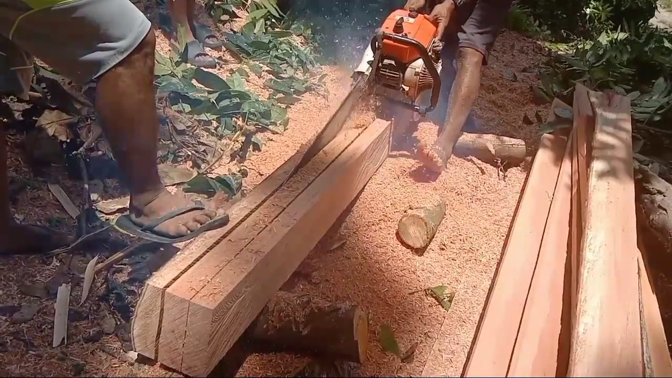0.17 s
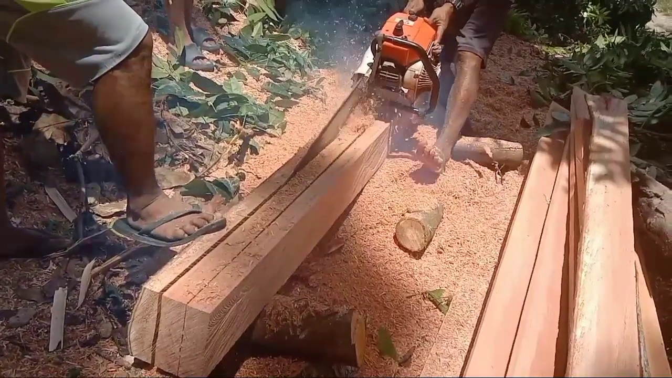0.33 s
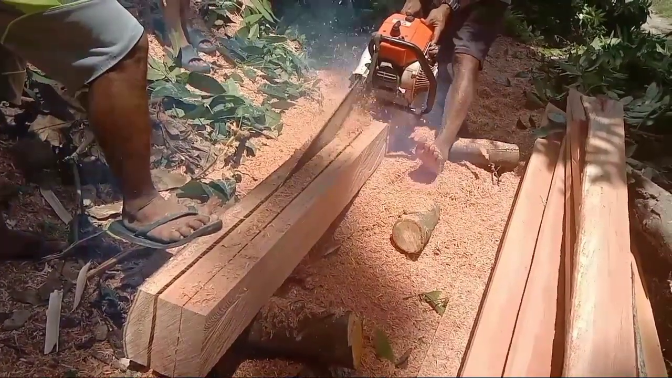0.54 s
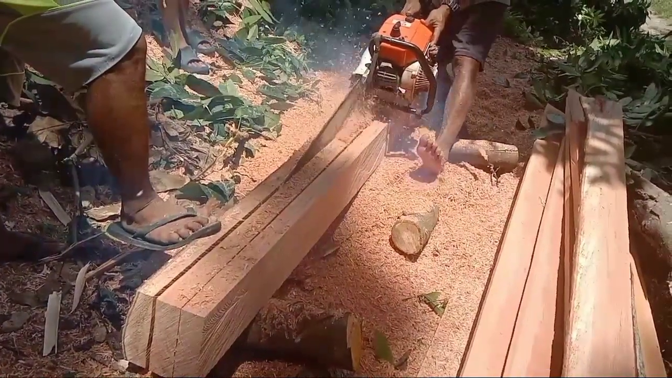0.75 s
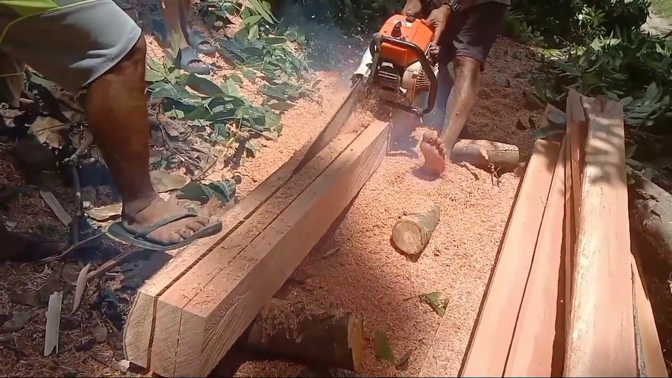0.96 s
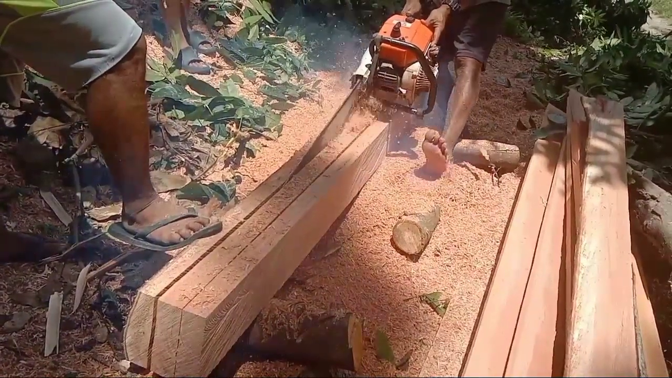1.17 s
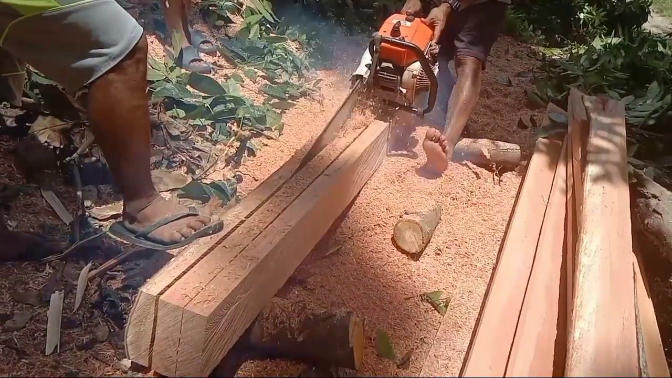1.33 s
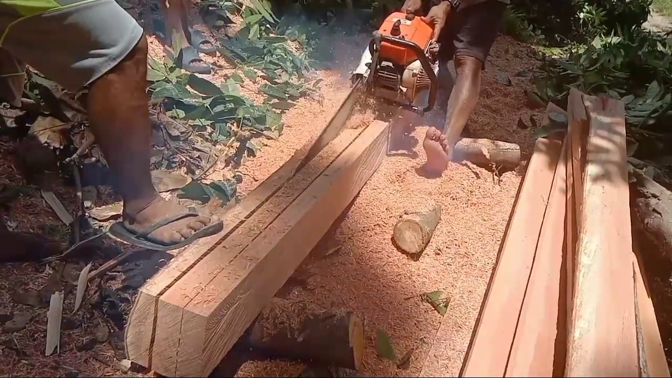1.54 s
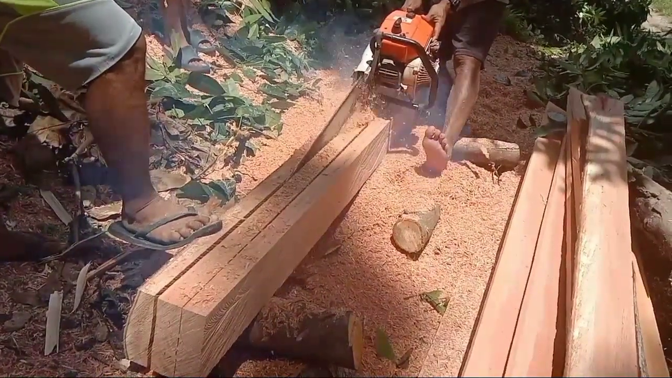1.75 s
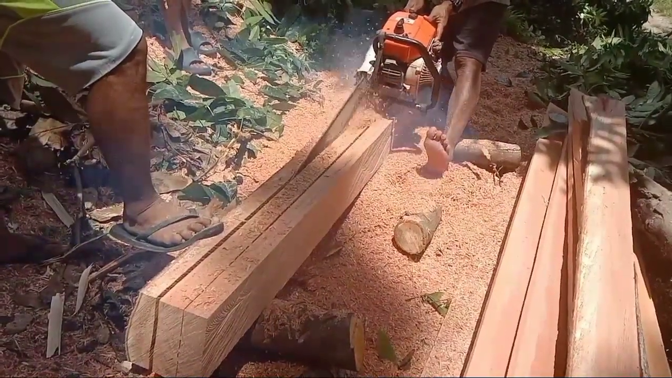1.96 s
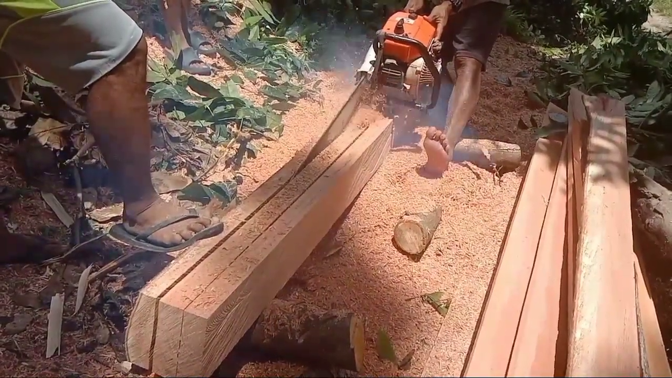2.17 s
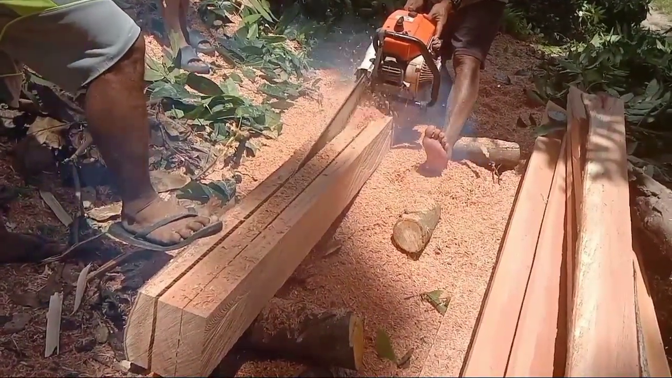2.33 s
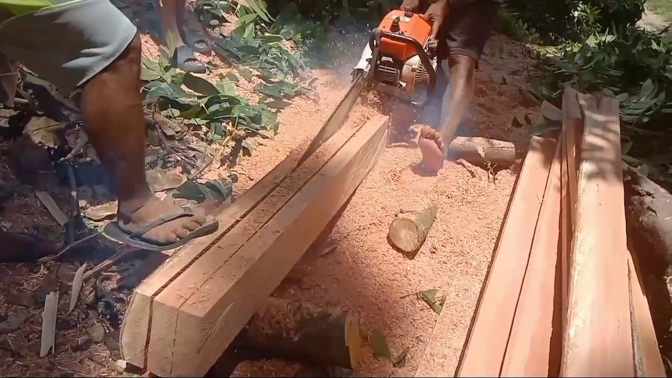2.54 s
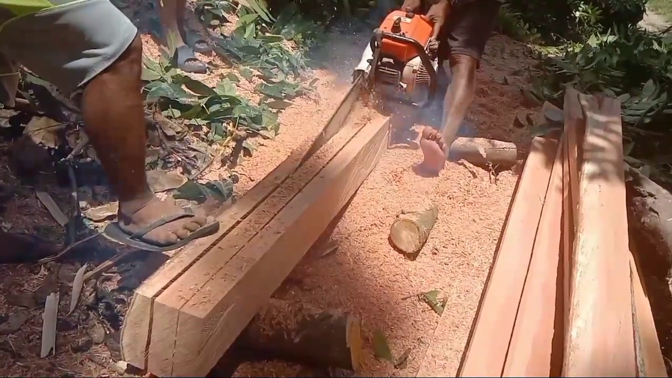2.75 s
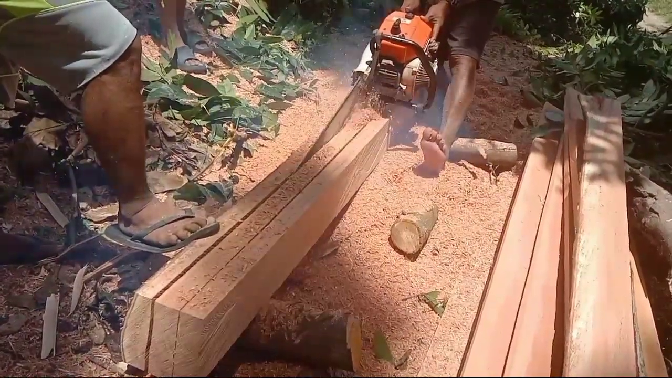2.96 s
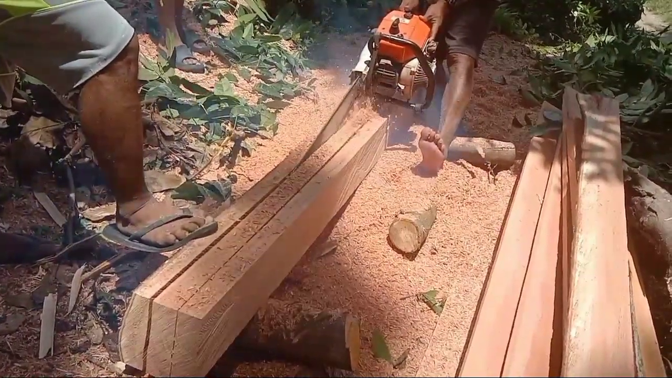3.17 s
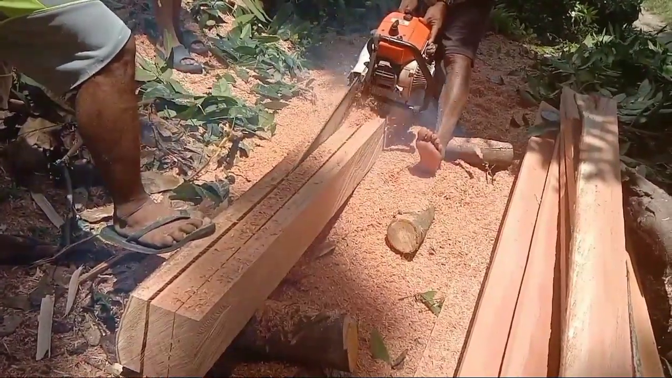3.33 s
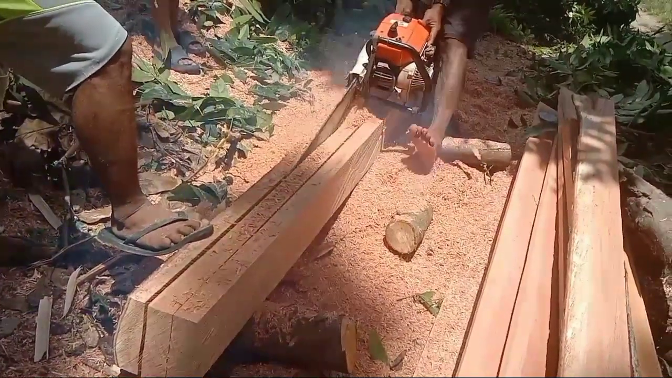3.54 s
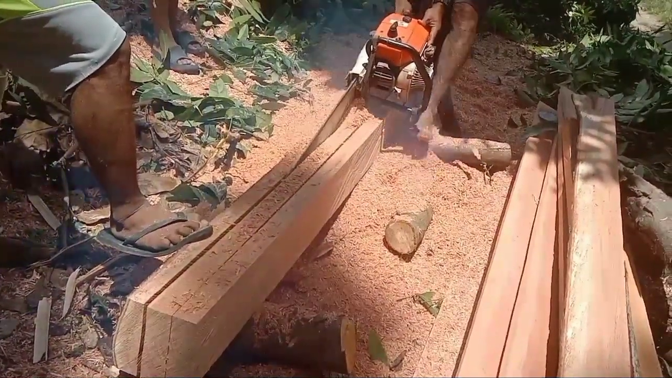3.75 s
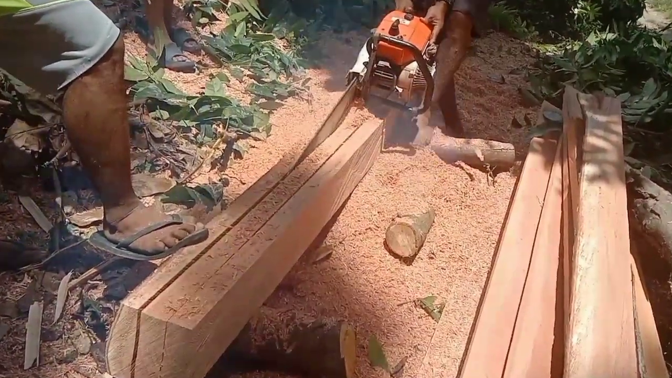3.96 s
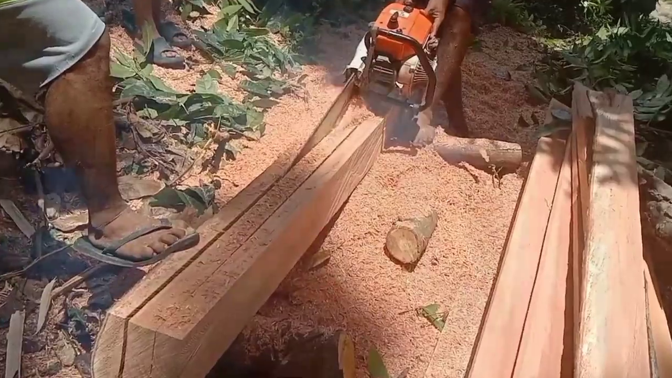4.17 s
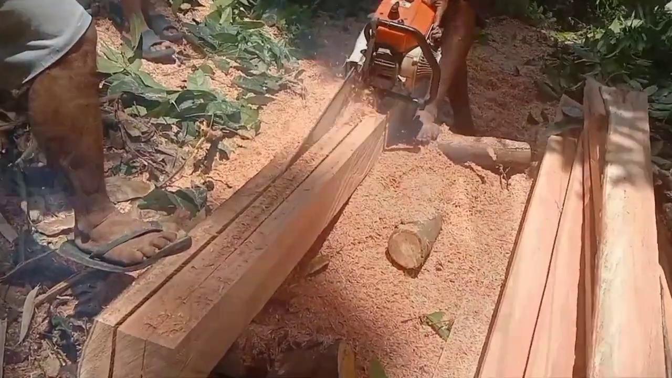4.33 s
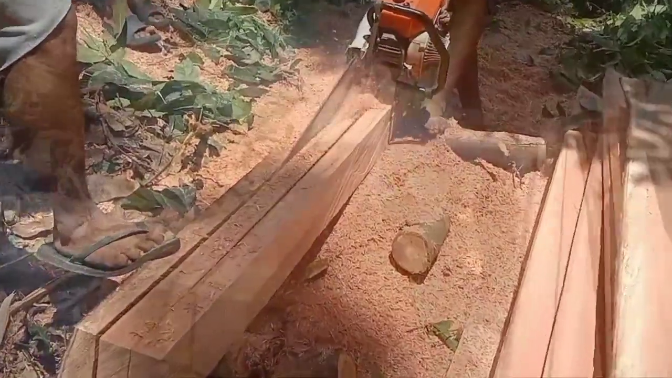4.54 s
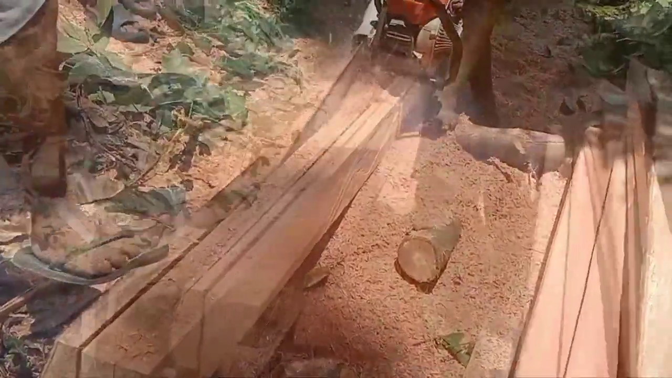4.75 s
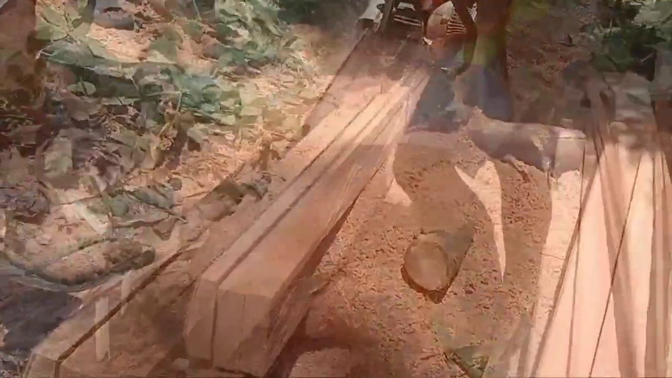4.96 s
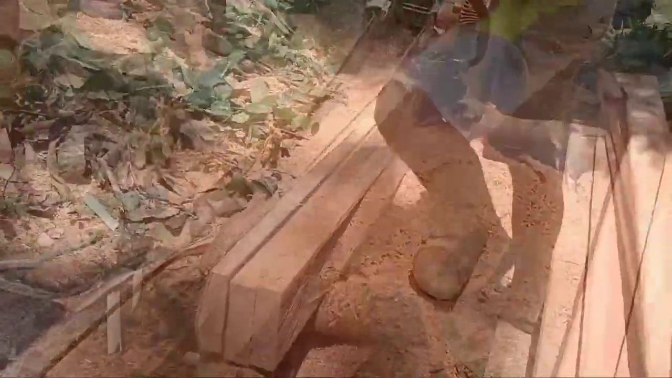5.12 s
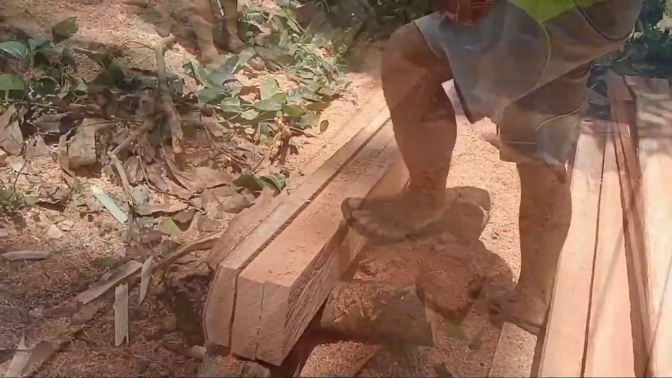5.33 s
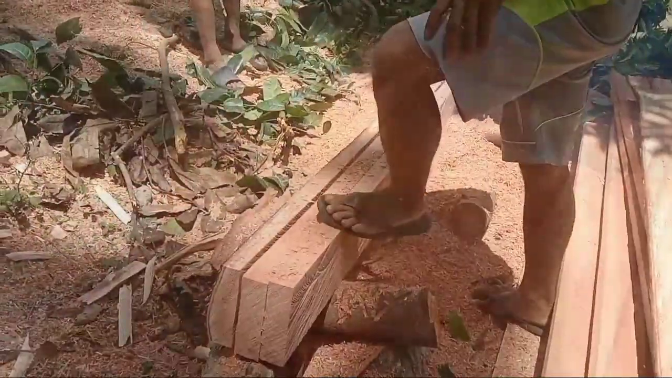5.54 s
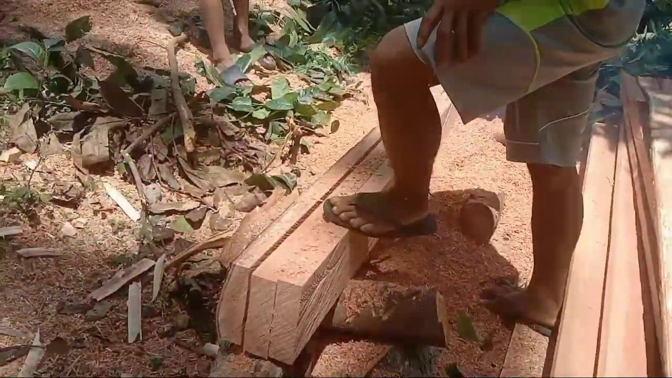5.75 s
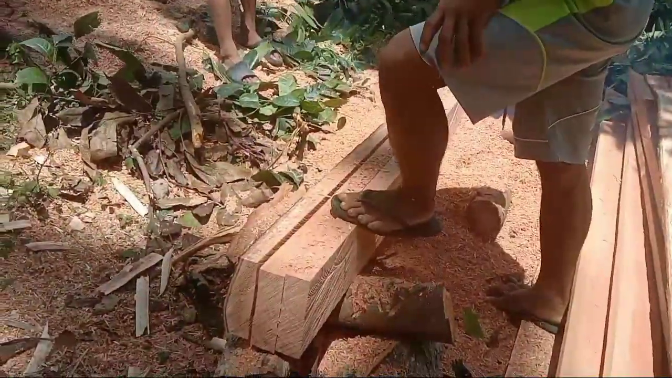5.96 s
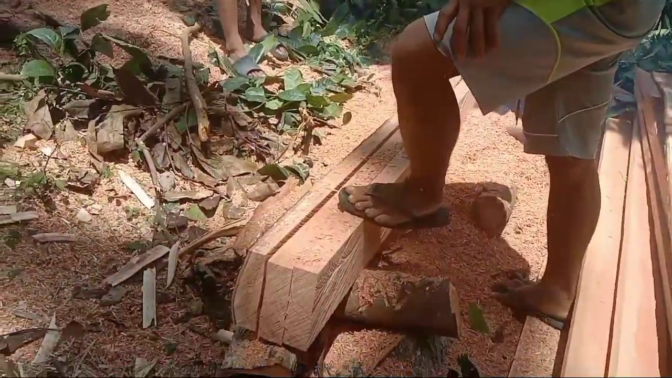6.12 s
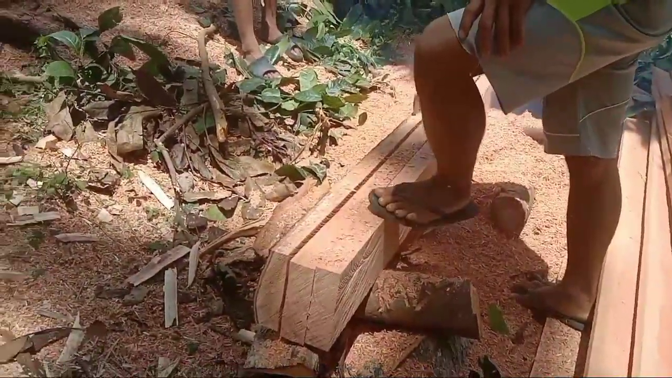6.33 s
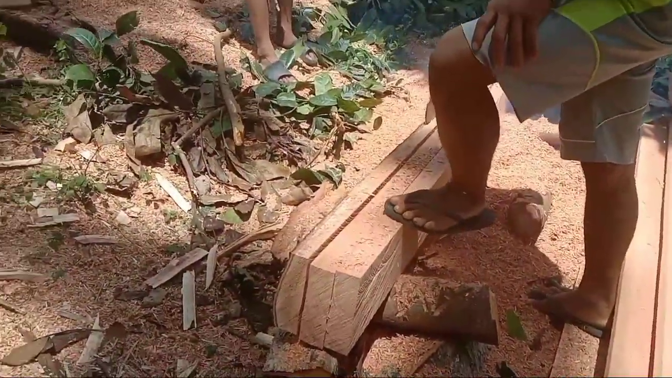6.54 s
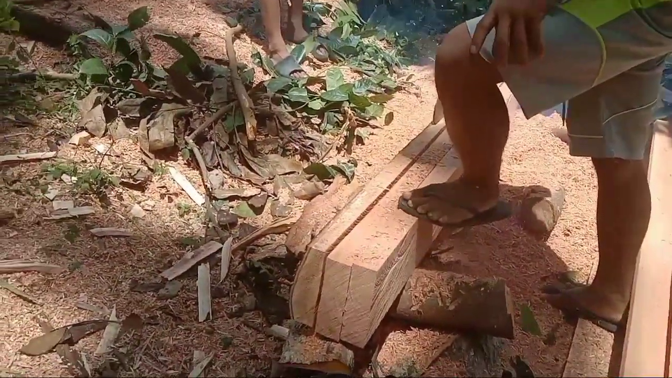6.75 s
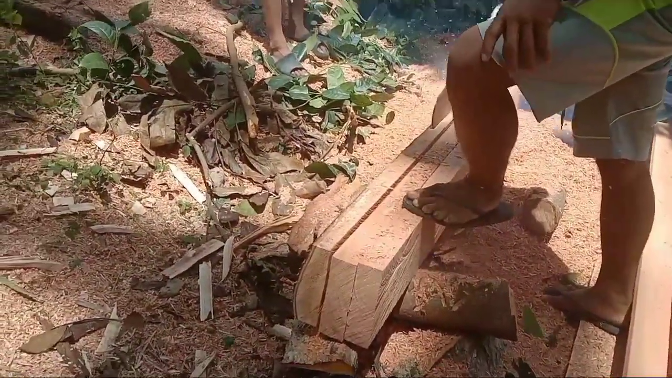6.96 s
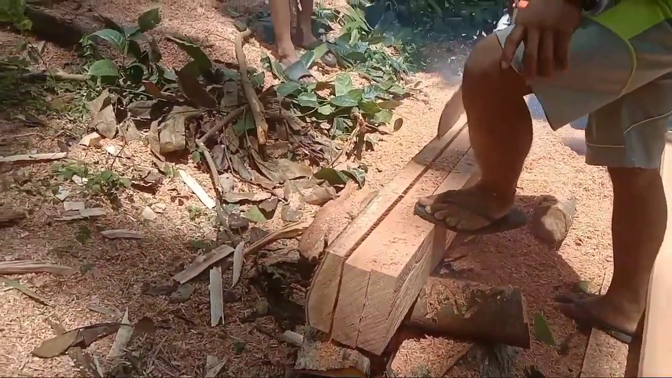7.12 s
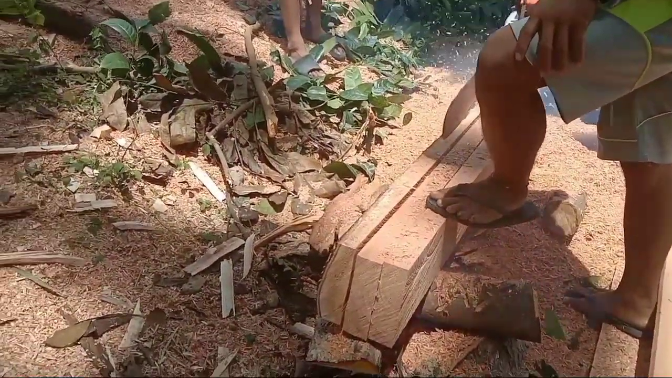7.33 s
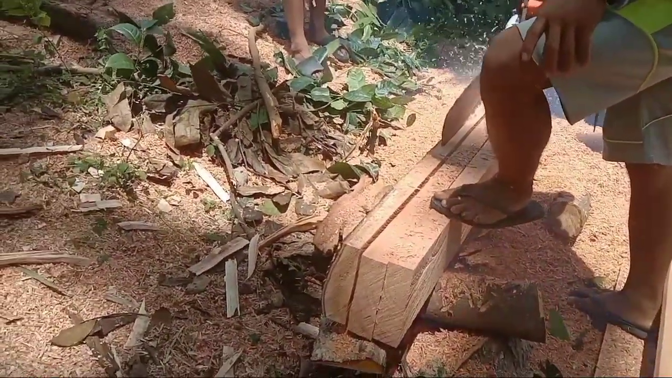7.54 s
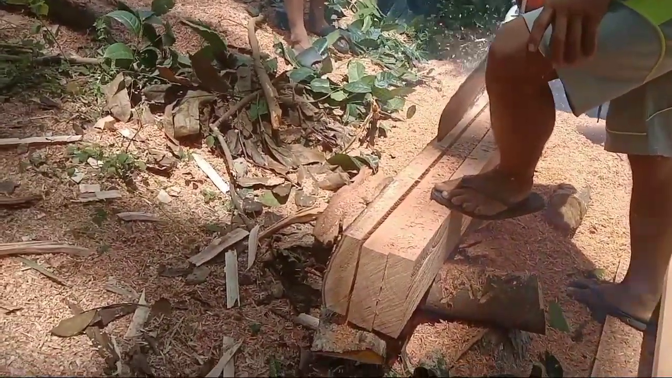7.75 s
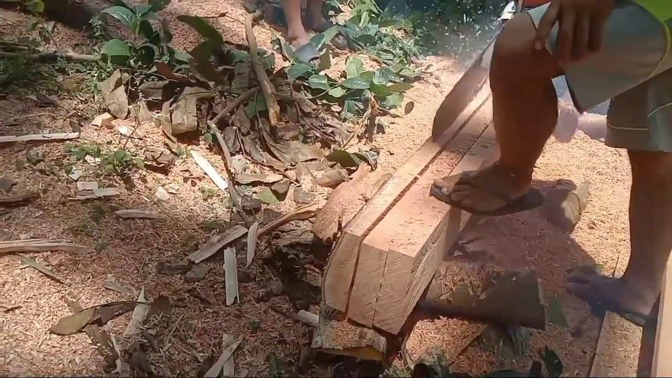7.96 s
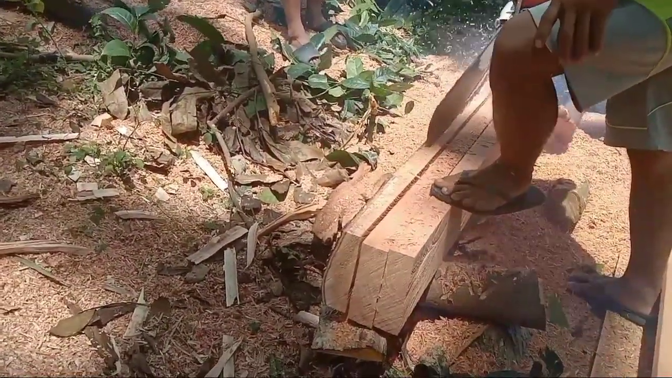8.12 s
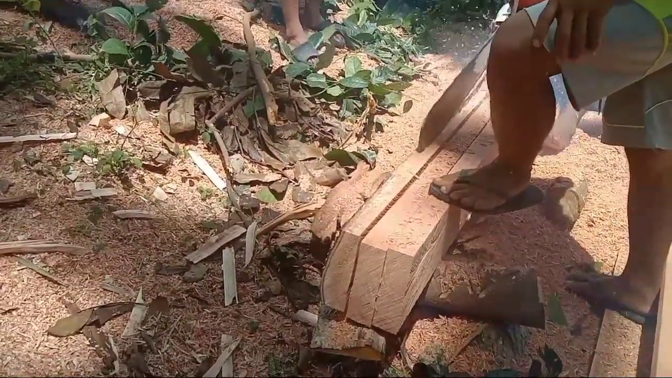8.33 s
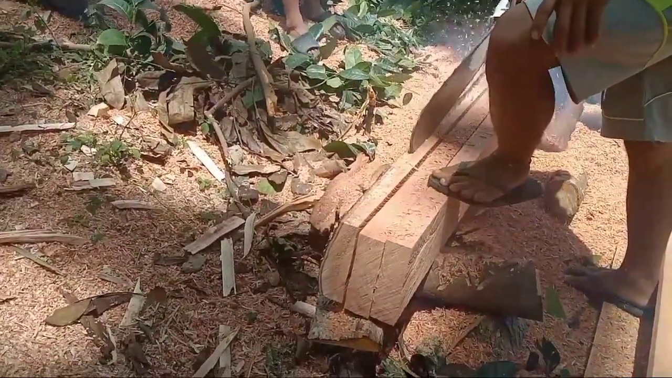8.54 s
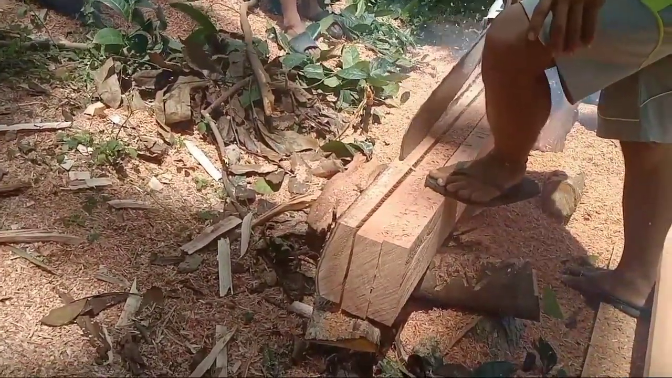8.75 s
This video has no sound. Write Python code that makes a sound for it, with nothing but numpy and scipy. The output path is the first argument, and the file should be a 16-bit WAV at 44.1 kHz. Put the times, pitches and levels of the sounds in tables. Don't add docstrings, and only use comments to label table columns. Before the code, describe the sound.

A two-stroke chainsaw snarls through a timber beam outdoors, coasts down briefly, revs up again, then continues with rough, uneven firing and wind thumps.

```python
import sys
import numpy as np
from scipy import signal
from scipy.io import wavfile
from scipy.ndimage import uniform_filter1d

SR = 44100
rng = np.random.default_rng(int(sys.argv[2]) if len(sys.argv) > 2 else 0)


def amplitude_ratio(level_db):
    exponent = np.asarray(level_db, float) / 20
    return 10 ** exponent


def persist_wave(psi):
    counts = np.round(np.clip(psi, -1, 1) * 32767).astype(np.int16)
    wavfile.write(sys.argv[1], SR, np.atleast_2d(counts).T)


N = 392049

# time in seconds, level in dB.
THUMPS = [(0.041, -23), (0.225, -43), (0.631, -38), (0.798, -22), (1.175, -28), (1.38, -25), (1.874, -22),
          (2.17, -36), (2.495, -31), (2.637, -37), (2.965, -40), (3.199, -28), (3.75, -49), (4.275, -36),
          (4.355, -35), (4.428, -31), (4.879, -39), (5.004, -40), (5.08, -32), (5.439, -45), (6.096, -50),
          (6.309, -23), (6.366, -27), (6.507, -34), (6.846, -42), (7.239, -32), (7.878, -39), (8.39, -24),
          (8.575, -43), (8.727, -40)]
# frequency in Hz, level in dB.
GUST_SPECTRUM = [(20, -25), (45, -12), (90, -6), (140, -5), (210, -2.5), (320, -11.5), (600, -8.5),
                 (1500, -68)]
CHIP_SPECTRUM = [(50, -14), (150, -1), (500, -2), (1500, -6), (2500, -16), (9000, -40)]
DRAUGHT_DB, CALM_DB = -18.5, -55
SHUT_CALM_DB = 68
CHIPS_PER_S, CHIP_S, CHIP_DB = 18, .0012, -2

# time in seconds, turns per second in Hz.
NEAR_SPEED = [(0.03, 101.74), (0.52, 104.1), (0.84, 100.82), (0.99, 101.07), (1.05, 99.48), (1.45, 98.49),
              (1.7, 100.62), (1.96, 103.66), (2.24, 101.12), (2.78, 100.71), (2.84, 101.43), (3.02, 100.02),
              (3.28, 100.18)]
FAR_SPEED = [(5.0, 102.55), (5.39, 103.67), (5.76, 101.17), (5.93, 100.38), (6.24, 102.34), (6.3, 102.1),
             (6.57, 99.46), (6.78, 102.52), (6.88, 102.02), (6.94, 101.28), (7.21, 100.7), (7.62, 103.11),
             (7.76, 102.0), (8.04, 101.3), (8.27, 104.29), (8.53, 100.85), (8.62, 99.64), (8.86, 99.39)]
NEAR_TURN, FAR_TURN = 1.52, .44
SLOWS_S, SHUT_S, OPEN_S = 3.3, 3.325, 4.1
SHUT_TAKES_S, OPEN_TAKES_S = .016, 0.3
FUEL_LEFT, FUEL_RUNS_OUT_PER_S, FUEL_KICK = 0.55, 0.32, 0.26
DROP_HZ, DROP_S, SAG_HZ_PER_S = 15.5, .115, 35
FREE_HZ, PICKUP_S, PICKUP_LAG_S = 104.2, .19, .1
FAR_THROTTLE = 0.91

# time in seconds, level in dB, how far the engine shell faces the microphone in dB.
NEAR_LEVEL = [(0, -13, -1), (.9, -14, 1.5), (2, -13.5, 0), (2.3, -13.5, -2.5), (3.29, -14, -3),
              (3.348, -21.5, 2.5), (3.392, -16.5, -0.5), (3.47, -17, -0.5), (3.74, -18.5, 0.5),
              (3.78, -20.5, -2), (4.05, -24.5, -6.5), (4.14, -22.5, -3), (4.18, -24, 3), (4.3, -21, 4.5),
              (4.6, -23.5, 4), (4.8, -26.5, 4), (5.2, -32.5, 0), (5.45, -34, 3)]
FAR_LEVEL = [(4.4, -34.5, -12), (4.7, -26.5, -1), (4.998, -23.5, 1.5), (5.2, -25, 3), (5.32, -21.5, -0.5),
             (5.745, -19, 0), (5.76, -16, 2.5), (6.15, -15, -2.5), (6.4, -16.5, 2), (6.75, -15, -2),
             (7.1, -16, 2), (7.57, -14, -1.5), (7.95, -14.5, -0.5), (8.25, -14.5, -0.5), (8.8, -16.5, 6),
             (8.86, -14, -0.5)]
# level in dB re loudness, share of facing followed, dB lost at shut throttle.
NEAR_LAYERS = [
    (-13.5, 1.1, 0.5),
    (-23.5, 0.92, 12),
    (-16.5, 0.32, 1),
]
FAR_LAYERS = [
    (-19.5, 1.4, 0),
    (-20.5, 0.87, 0),
    (-21, 0.9, 0),
]
# start in seconds, end in seconds, even blows over odd blows
# in dB, upper ring gain in dB.
NEAR_SPELLS = [
    (1.61, 1.844, 2, 2),
    (3.33, 4.12, -3, 0),
    (4.207, 4.356, -1, 3),
]
FAR_SPELLS = [
    (4.4, 4.897, 3.2, 0),
    (4.914, 5.302, 4.5, 6),
    (5.41, 5.989, 4.5, 3),
    (6.286, 6.634, -4, 1.5),
    (6.837, 6.96, 5.5, 4),
    (6.965, 7.278, 6.5, 10.5),
    (7.707, 7.836, -4.5, 5),
    (7.92, 8.004, -2, 1.5),
    (8.32, 8.818, -6, 5),
]
SPELL_EDGE_S = 0.053
# time in seconds, share of the blow returned.
NEAR_ECHO = [(0, 0.32), (1.9, 0.13), (4.2, .11), (4.42, 0.34), (5.5, .09)]
FAR_ECHO = [(6.8, .065), (6.9, 0.21), (8.8, 0.23)]

# frequency in Hz, rise in s, port open in s, share left ringing, ring decay in s,
# echo delay in s, blow scatter in dB, timing scatter in s.
NEAR_PIPE = (874.3, 0.00051, 0.00264, 0.47, 0.0036, .0052, 0.54, 0.000034)
FAR_PIPE = (827.5, 0.00029, 0.00342, 0.14, 0.0005, 0.00563, 0.34, 0.0000088)
COLD_PIPE = (813.7, 0.005, 0.00273, 0.7, 0.0021)
SOFT_PIPE = (825, .0012, .0023, .55, .0014)
DEEP_PIPE = (693, 0.003, 0.0027, 1.02, 0.0011)
SECOND_BLOW = 0.3676
SOFT_LATE_S, WEAK_PUFF_LATE_S = .0009, 0.00162
SINK_FROM_S, SINK_TAKES_S = 7.25, 1.3
SINK, SUNK_PITCH = .6, 0.9
# frequency in Hz, width in Hz, level in dB, dB lost per echo share.
NEAR_SIDE, FAR_SIDE = (1192, 143, -25, 6), (1124, 128, -17, 48)
# frequency in Hz, level in dB.
NEAR_PUFF = [(40, -77), (100, -16), (200, -34), (400, -21), (520, -42), (620, -14.5), (1250, -14.5),
             (1450, -21.5), (1750, -16.5), (2050, -17.5), (3500, -29.5), (6000, -53)]
FAR_PUFF = [(40, -58), (100, -12.5), (200, -16.5), (300, -28), (450, -16), (1100, -23.5), (1300, -15),
            (1700, -22), (1950, -23), (2100, -29), (2500, -26), (2780, -29.5), (3150, -19.5), (3600, -42),
            (6000, -67)]
COLD_PUFF = [(80, -55), (125, -20), (200, -20), (330, -13), (450, -21), (550, -28), (1000, -47)]

# frequency in Hz, width in Hz, level in dB.
CASE = [
    (250, 60, -37),
    (352, 70, -34),
]
# frequency in Hz, width in Hz, random share from 0 to 1.
NEAR_SHELL = [
    (2340, 150, .06),
    (3200, 300, .2),
]
FAR_SHELL = [
    (2320, 200, .07),
    (3000, 200, .1),
]
# frequency in Hz, width in Hz, level in dB, start in seconds.
COLD_SHELL = [
    (1895, 120, 7, 3.33),
    (2460, 150, -3, 3.4),
    (4990, 150, -6, 3.52),
]
COLD_FADE_S, COLD_FADE_TAKES_S = 3.8, .35
# order, start in s, end in s, level in dB re lower ring, phase in turns.
NEAR_ORDER, FAR_ORDER = (23, -1, 4.7, -4.5, 0.3), (31, 7.35, 8.3, -4, 0.7)
# frequency in Hz, level in dB.
NEAR_HISS = [(2000, -50), (3400, -4), (3600, -25), (4140, -19), (5110, -5.5), (5960, -12), (6150, -10.5),
             (6510, -3), (6810, -1.5), (9550, -21), (10200, -20), (11300, -13), (12900, -6), (14900, -10.5),
             (15600, -3)]
FAR_HISS = [(2000, -69), (3400, 1), (3650, -3.5), (3860, -31), (4140, -18), (5110, -7.5), (5730, -8.5),
            (6310, -2), (7210, 2.5), (7840, -2), (8790, -16), (9670, -15.5), (14000, -5.5), (14900, -3),
            (15600, -4)]
ROAR = [(60, -30), (300, -5), (600, -4), (900, 0), (1300, 0.5), (2000, -7.5), (2400, -14), (3300, -11.5),
        (4200, -16.5), (5500, -11.5)]
NEAR_FIN_HZ, FAR_FIN_HZ, FIN_WIDTH_HZ, FIN_DB = 6810, 7150, 520, -8.5
# frequency in Hz, width in Hz, depth from 0 to 1.
GROUND_NOTCHES = [(1417, 190, 0.23), (2043, 88, 0.8), (2850, 68, 0.7)]
BEAM_NOTCHES = [(517, 47, 0.54), (1410, 230, 0.47), (2030, 130, 0.45)]


def evened(x):
    return x / np.sqrt(np.mean(x ** 2) + 1e-20)


def ramp(start, takes):
    return np.clip((np.arange(N) / SR - start) / takes, 0, 1)


def curve(rows):
    s, *columns = np.transpose(rows)
    return [np.interp(np.arange(N) / SR, s, c) for c in columns]


def drift(span):
    once = uniform_filter1d(rng.standard_normal(N), span)
    return evened(uniform_filter1d(once, span))


def colour(x, points):
    hz, db = np.transpose(points)
    log_hz = np.log(np.fft.rfftfreq(4096, 1 / SR) + 1)
    log_gain = np.log(amplitude_ratio(np.interp(log_hz, np.log(hz), db, -90, -90)))
    full = signal.hilbert(np.r_[log_gain, log_gain[-2:0:-1]])
    response = np.fft.ifft(np.exp(full.conj())).real[:2048]
    return signal.oaconvolve(x, response)[:N]


def resonate(x, hz, width):
    r = np.exp(-np.pi * width / SR)
    return 2 * signal.lfilter([1 - r], [1, -r * np.exp(2j * np.pi * hz / SR)], x).real


def ring(x, hz, width):
    return resonate(resonate(x, hz, width), hz, 1.41 * width)


def dip(x, notches):
    for hz, width, depth in notches:
        x = x - np.clip(depth, 0, 1) * resonate(x, hz, width)
    return x


def clicks(s, size):
    at = np.clip(s * SR, 0, N - 2)
    k = at.astype(int)
    return np.bincount(k, size * (k + 1 - at), N) + np.bincount(k + 1, size * (at - k), N)


def fade(x, s):
    return signal.lfilter([1], [1, -np.exp(-1 / (s * SR))], x)


def near_controls():
    t = np.arange(N) / SR
    coasted = np.clip(t, SLOWS_S, OPEN_S) - SLOWS_S
    revved = np.maximum(t - OPEN_S, 0)
    coast = curve(NEAR_SPEED)[0] - DROP_HZ * (1 - np.exp(-coasted / DROP_S)) - SAG_HZ_PER_S * coasted
    short_of_free = np.exp(-(np.hypot(revved, PICKUP_LAG_S) - PICKUP_LAG_S) / PICKUP_S)
    hz = FREE_HZ + (coast - FREE_HZ) * short_of_free
    shut = 1 - (1 - FUEL_LEFT) * ramp(SHUT_S, SHUT_TAKES_S) - FUEL_RUNS_OUT_PER_S * coasted
    opened = FUEL_KICK * ramp(OPEN_S, .05) + (1 - FUEL_KICK) * ramp(OPEN_S, OPEN_TAKES_S)
    return hz, np.clip(shut + (1 - shut) * opened, 0, 1)


def draught(db):
    fuel = near_controls()[1]
    return amplitude_ratio(curve(NEAR_LEVEL)[0] + db - SHUT_CALM_DB * (1 - fuel))


def wind():
    lumps = amplitude_ratio(4.5 * drift(380) - 4)
    blown = draught(DRAUGHT_DB) * (1 - ramp(5.3, .25))
    steady = (blown + amplitude_ratio(CALM_DB) * ramp(3.95, .2)) * lumps
    s, db = np.transpose(THUMPS)
    hits = uniform_filter1d(clicks(s + 0.002, amplitude_ratio(db - 11.0)), 300)
    thumps = 1.4 * fade(hits, 0.039)
    return (steady + thumps) * evened(colour(rng.standard_normal(N), GUST_SPECTRUM))


def chips():
    struck = rng.random(N) < CHIPS_PER_S / SR
    size = struck * amplitude_ratio(5.3 * np.minimum(rng.exponential(1, N), 3))
    crackle = evened(colour(fade(size, CHIP_S) * rng.standard_normal(N), CHIP_SPECTRUM))
    return crackle * draught(DRAUGHT_DB + CHIP_DB) * (1 - ramp(5.2, .1))


def outdoors(x):
    highpass = signal.butter(4, 82, "highpass", fs=SR, output="sos")
    return dip(signal.sosfilt(highpass, x), GROUND_NOTCHES)


def spells(rows):
    half = SPELL_EDGE_S / 2
    on = [ramp(a - half, SPELL_EDGE_S) - ramp(b - half, SPELL_EDGE_S) for a, b, *_ in rows]
    return np.transpose(rows)[2:] @ np.array(on)


def crank_blows(crank_hz, fuel, turn_s, turn, uneven_db, ground, scatter_db, scatter_s):
    t = np.arange(N) / SR
    turns = np.cumsum(crank_hz) / SR
    turns += turn - turns[round(turn_s * SR)]
    at = np.flatnonzero(np.diff(np.floor(turns)))
    hz, throttle, lead_db = crank_hz[at], fuel[at], uneven_db[at]
    luck = rng.standard_normal((len(at), 4)).T
    s = t[at + 1] - turns[at + 1] % 1 / hz + scatter_s * luck[0]
    parity = (-1) ** np.floor(turns[at + 1])
    echo = curve(ground)[0][at] * amplitude_ratio(-.6 * abs(lead_db))
    skip_db = np.maximum(-lead_db * parity, 0) * throttle
    weak_db = skip_db + scatter_db * rng.exponential(1, len(at)) * throttle
    soft = np.tanh((skip_db / 4.13) ** 3)
    scale = np.sqrt(100 / hz * 2 / (1 + amplitude_ratio(-2 * abs(lead_db))))
    size = scale * throttle * amplitude_ratio(-weak_db)
    sharp = amplitude_ratio(-2.2 * weak_db)
    flow = clicks(s, sharp * amplitude_ratio(2.0 * luck[1]) * (0.096 + 0.25 * throttle))
    gate = uniform_filter1d(fade(flow, 0.0024), 40)
    firing = np.interp(t, t[at], throttle)
    steady = np.exp(-np.interp(t, t[at], (lead_db * throttle / 3) ** 2))
    return dict(turns=turns, hz=hz, throttle=throttle, lead_db=lead_db, luck=luck, s=s, parity=parity,
                echo=echo, weak_db=weak_db, soft=soft, scale=scale, size=size, sharp=sharp, gate=gate,
                firing=firing, steady=steady)


def burst(x, hz, rise, open_s, left, decay):
    t = np.arange(1300) / SR
    shut = np.clip((t - open_s) / 0.00061, 0, 1)
    dying = left * np.exp(-np.maximum(t - open_s, 0) / decay)
    size = (1 - np.exp(-t / rise)) * (1 - shut + shut * dying)
    tone = size * np.sin(2 * np.pi * hz * t)
    tone -= size * tone.sum() / size.sum()
    return signal.oaconvolve(x, tone / np.sqrt(np.sum(tone ** 2) * 100 / SR))[:N]


def silencer(pipe, echo_s, sink, side, s, size, soft, sharp, throttle, echo, **_):
    blows = clicks(s, size * (1 - soft)) + clicks(s + echo_s, echo * size)
    out = burst(blows * (1 - sink), *pipe)
    out += burst(blows * sink, SUNK_PITCH * pipe[0], *pipe[1:])
    out += burst(clicks(s + SOFT_LATE_S, size * soft), *SOFT_PIPE)
    out += burst(clicks(s, 0.54 * echo * size), *DEEP_PIPE)
    side_hz, side_width, side_db, lost_db = side
    struck = clicks(s, sharp * throttle * amplitude_ratio(-lost_db * echo))
    return out + amplitude_ratio(side_db) * evened(ring(struck, side_hz, side_width))


def crankcase(s, lead_db, throttle, parity, **_):
    rocking = clicks(s, np.tanh(lead_db / 4) * throttle ** 4 * parity)
    return sum(amplitude_ratio(db + 65) * ring(rocking, mode_hz, width) for mode_hz, width, db in CASE)


def gas_puff(puff, puff_db, s, size, weak_db, soft, throttle, **_):
    puffs = clicks(s + WEAK_PUFF_LATE_S * soft, size * amplitude_ratio(-.6 * weak_db) * throttle ** 0.49)
    return amplitude_ratio(puff_db) * colour(puffs, puff)


def cold_pumping(s, hz, scale, throttle, **_):
    idle = scale * (1 - throttle)
    first = clicks(s, idle)
    second = clicks(s + SECOND_BLOW / hz, idle)
    third = clicks(s + 2 * SECOND_BLOW / hz, idle)
    pumped = 0.85 * first + second + 0.19 * third
    pipe = 0.93 * burst(pumped, *COLD_PIPE) + amplitude_ratio(47) * colour(first, COLD_PUFF)
    struck = second + 0.6 * pumped
    shell = sum(amplitude_ratio(db) * ramp(start, .12) * ring(struck, mode_hz, width)
                for mode_hz, width, db, start in COLD_SHELL)
    return pipe, amplitude_ratio(41.5) * (1 - .6 * ramp(COLD_FADE_S, COLD_FADE_TAKES_S)) * shell


def shell_ring(mode, slip, s, sharp, throttle, gate, firing, **_):
    mode_hz, width, loose = mode
    knock = evened(ring(clicks(s + .0001 * loose * slip, sharp * throttle), mode_hz, width))
    rattle = evened(ring((gate + .4) * rng.standard_normal(N), mode_hz, width)) * (.3 + .7 * firing)
    return 0.86 * (np.sqrt(1 - loose) * knock + np.sqrt(loose) * rattle)


def crank_order(order, crank_hz, turns, steady, **_):
    number, start, end, db, phase = order
    heard = (ramp(start, .1) - ramp(end, 0.092)) * steady * np.clip(crank_hz / 10 - 8.5, 0, 1)
    return heard * amplitude_ratio(db + 1.2 * drift(3000)) * np.sin(2 * np.pi * (number * turns + phase))


def gas_and_chain_hiss(hiss, fin_hz, s, sharp, throttle, gate, luck, **_):
    flutter = amplitude_ratio(1.3 * drift(300) + .4 * drift(5000))
    jet = evened(colour((gate + 0.069) * rng.standard_normal(N), hiss))
    late = 0.000829 + 0.000397 * luck[2]
    struck = clicks(s + late, sharp * throttle * amplitude_ratio(3.7 * luck[3]))
    return flutter * (jet + amplitude_ratio(FIN_DB) * evened(ring(struck, fin_hz, FIN_WIDTH_HZ)))


def roar(roar_db, gate, firing, **_):
    noise = evened(colour((gate + .5) * rng.standard_normal(N), ROAR))
    return amplitude_ratio(roar_db - 3.0 * (1 - firing)) * noise


def saw(crank_hz, fuel, turn_s, turn, loudness, layers, uneven, ground, pipe, sink, side, order, shell,
        puff, hiss, fin_hz, puff_db, roar_db):
    *chamber, echo_s, scatter_db, scatter_s = pipe
    level_db, facing_db = curve(loudness)
    uneven_db, ring_db = spells(uneven)
    low, high, air = (amplitude_ratio(level_db + db + share * facing_db - shut_db * (1 - fuel))
                      for db, share, shut_db in layers)
    high = high * amplitude_ratio(ring_db)
    b = crank_blows(crank_hz, fuel, turn_s, turn, uneven_db, ground, scatter_db, scatter_s)
    fired = silencer(chamber, echo_s, sink, side, **b) + crankcase(**b) + gas_puff(puff, puff_db, **b)
    cold_pipe, cold_shell = cold_pumping(**b)
    low_ring, high_ring = (shell_ring(mode, slip, **b) for mode, slip in zip(shell, b["luck"][2:]))
    out = amplitude_ratio(level_db) * (fired + cold_pipe + roar(roar_db, **b))
    out += low * (cold_shell + low_ring + crank_order(order, crank_hz, **b))
    return out + high * high_ring + air * gas_and_chain_hiss(hiss, fin_hz, **b)


def scene():
    near = saw(*near_controls(), NEAR_SPEED[0][0], NEAR_TURN, NEAR_LEVEL, NEAR_LAYERS, NEAR_SPELLS,
               NEAR_ECHO, NEAR_PIPE, np.zeros(N), NEAR_SIDE, NEAR_ORDER, NEAR_SHELL, NEAR_PUFF,
               NEAR_HISS, NEAR_FIN_HZ, puff_db=43, roar_db=-18)
    sink = SINK * ramp(SINK_FROM_S, SINK_TAKES_S)
    far = saw(*curve(FAR_SPEED), np.full(N, FAR_THROTTLE), FAR_SPEED[0][0], FAR_TURN, FAR_LEVEL,
              FAR_LAYERS, FAR_SPELLS, FAR_ECHO, FAR_PIPE, sink, FAR_SIDE, FAR_ORDER, FAR_SHELL,
              FAR_PUFF, FAR_HISS, FAR_FIN_HZ, puff_db=42, roar_db=-22)
    near = dip(near, BEAM_NOTCHES) * (1 - ramp(5.52, .3))
    far = far * ramp(4.02, 0.21)
    return (wind() + chips() + outdoors(near + far))[None]


def band_limit(x):
    return signal.sosfilt(signal.butter(12, 16580, fs=SR, output="sos"), x)


def record(dry):
    thin = signal.sosfilt(signal.butter(2, 45, "highpass", fs=SR, output="sos"), dry)
    limit = 1.7
    return band_limit(-limit * np.tanh(1.02 * thin / limit))


dry = scene()
out = record(dry)
persist_wave(out)
```